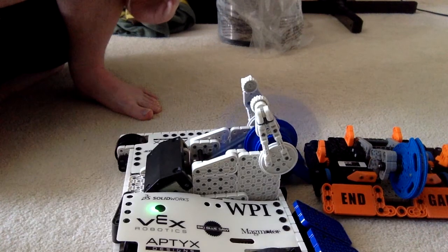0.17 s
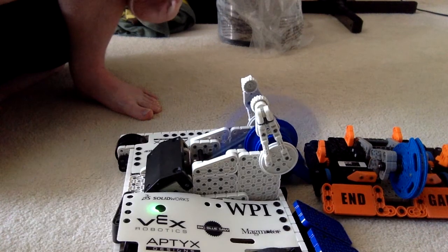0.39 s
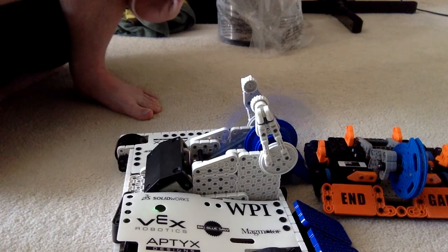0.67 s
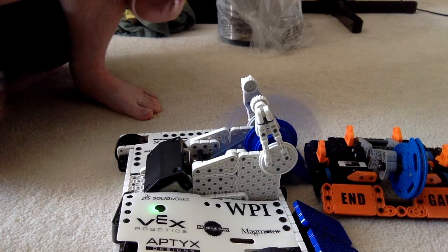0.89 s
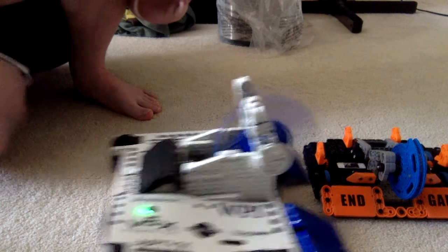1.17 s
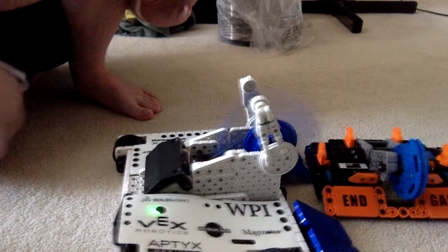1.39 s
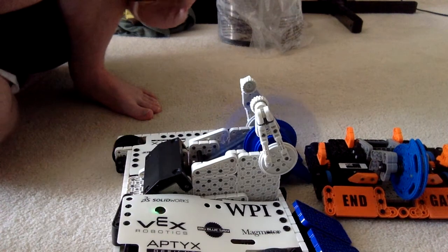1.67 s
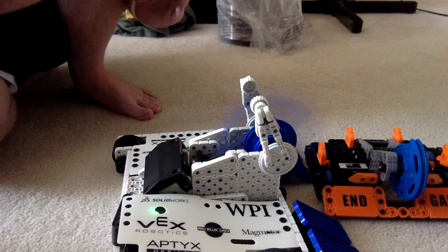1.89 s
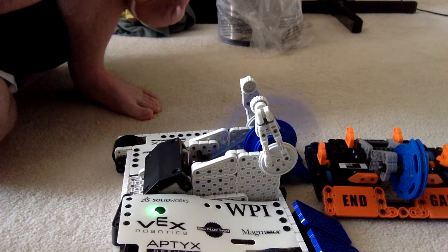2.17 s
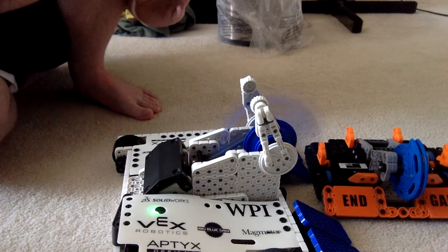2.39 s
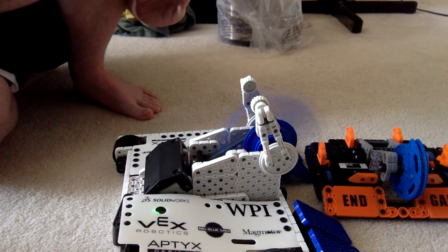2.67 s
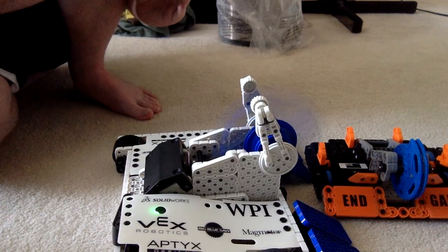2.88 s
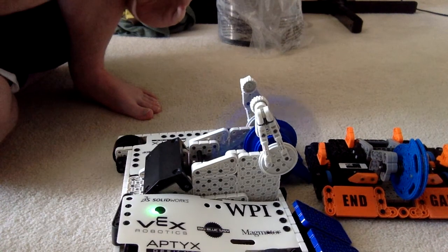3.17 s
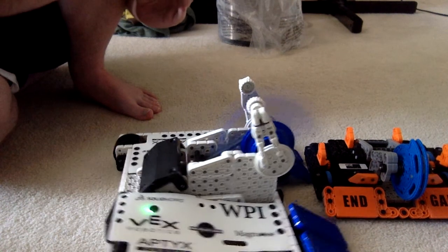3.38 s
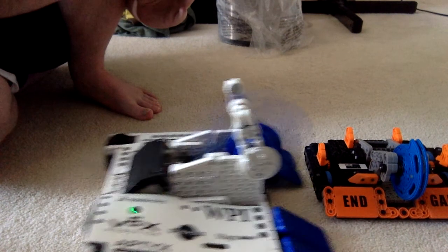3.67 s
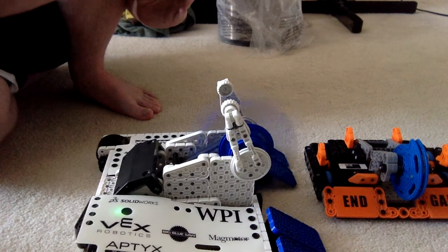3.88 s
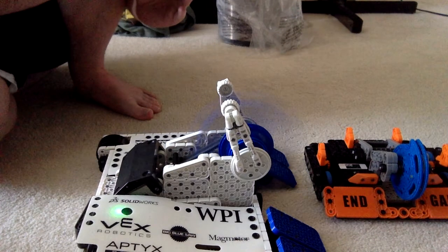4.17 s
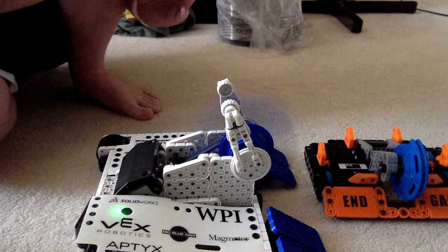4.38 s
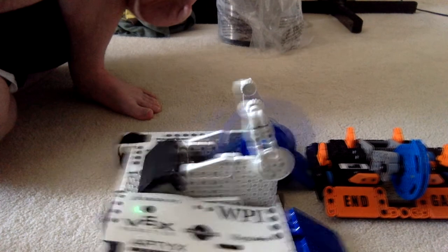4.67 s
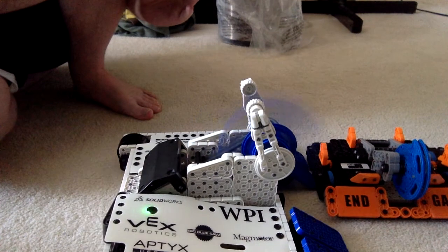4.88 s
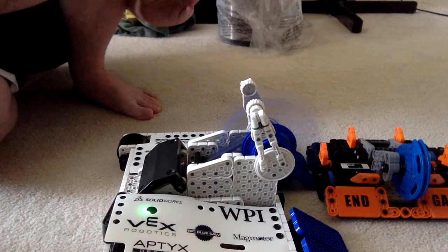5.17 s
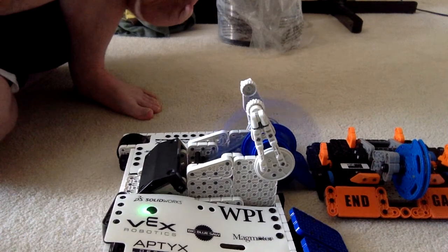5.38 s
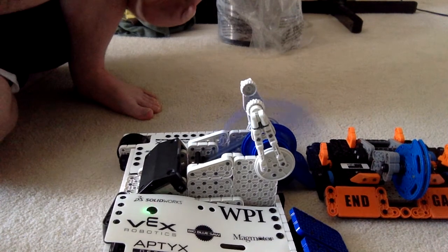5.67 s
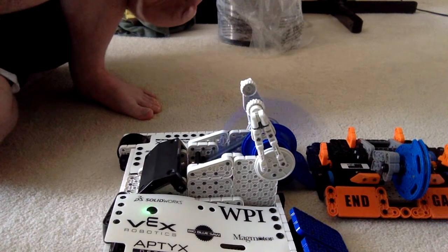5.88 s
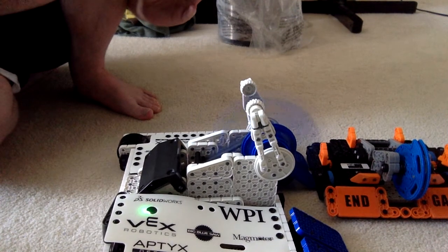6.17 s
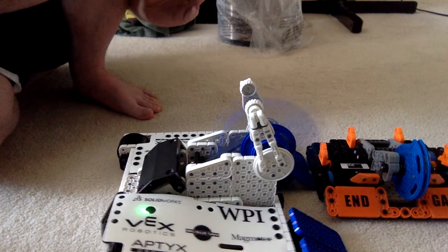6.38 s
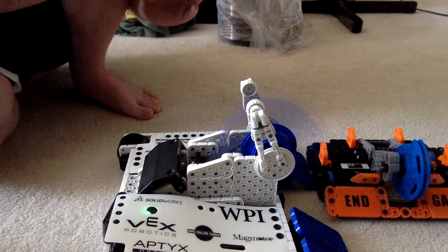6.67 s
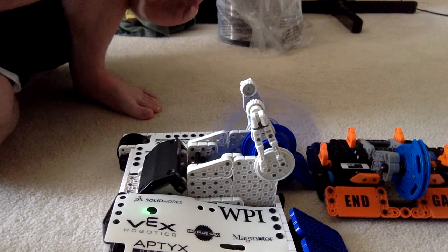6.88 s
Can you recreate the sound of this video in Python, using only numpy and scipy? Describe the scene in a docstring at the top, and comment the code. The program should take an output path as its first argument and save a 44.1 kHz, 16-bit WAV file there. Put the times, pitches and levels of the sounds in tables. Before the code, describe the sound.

A small plastic robot's chain-driven spinner rattles fast and evenly, bright clacks about ten per second over faint hiss, with brief motor whirs, close up.

```python
"""A chain-driven spinner on a small plastic robot on carpet, heard close up.
On most turns the slack chain pings and then slaps the frame; between turns it ticks. Each blow is a
burst of decaying modes. Under it, link-rate noise puffs make the fine clatter of the sprocket.
The wheel motors whine (tooth harmonics) and grind (band noise) at each shuffle; a few knocks sound in the chassis.
"""
import sys
import numpy as np
from scipy import signal
from scipy.io import wavfile
from scipy.ndimage import uniform_filter1d

SR = 44100
rng = np.random.default_rng(int(sys.argv[2]) if len(sys.argv) > 2 else 0)


def output_pcm(signal):
    """Save a mono or channel-first signal as 16-bit PCM at the path in sys.argv[1].

    Samples are clipped to [-1, 1] before scaling.
    """
    pcm = np.clip(np.atleast_2d(signal).T, -1, 1) * 32767
    wavfile.write(sys.argv[1], SR, np.round(pcm).astype(np.int16))


N = 310464

# Whirr noise slope, relative levels: freq_hz, level_db
WHIRR_SLOPE = [(30, -42), (130, -17.5), (320, -13), (480, -10), (1100, -13), (2800, -11.5), (4400, -6.5),
               (8000, -10), (12600, -21), (16500, -28)]
# Frame resonances on that slope: centre_hz, width_hz, lift_db
FRAME_RESONANCES = [(476, 64, -12.5), (1403, 290, 7), (2188, 610, 10), (5060, 300, 3), (7060, 520, 11),
                    (8620, 340, 7.5), (9650, 250, 8.5), (14200, 1100, 11)]
# Chassis knocks: start_s, pitch_hz, level_db
CHASSIS_KNOCKS = [(1.366, 330, -42), (1.662, 3350, -36), (5.523, 2040, -28)]
# Wheel motor runs, one list per motor run: time_s, teeth_hz, level_db. The first list is the second # wheel
# motor, falling in pitch during the same shuffle as the third list
SHUFFLE_RUNS = [
    [(4.7, 1380, -44), (4.725, 1290, -34), (4.75, 1170, -44)],
    [(1.22, 580, -56), (1.305, 790, -45), (1.325, 775, -44), (1.38, 610, -56)],
    [(4.50, 930, -50), (4.53, 970, -39), (4.556, 1055, -36), (4.575, 925, -36), (4.6, 775, -45),
     (4.65, 805, -46), (4.694, 970, -42), (4.752, 948, -39), (4.782, 997, -32), (4.815, 965, -36),
     (4.845, 985, -48), (4.865, 960, -38), (4.9, 980, -50), (4.925, 1020, -39), (4.958, 860, -43),
     (4.99, 928, -38), (5.06, 725, -54)],
    [(5.67, 600, -52), (5.728, 767, -42), (5.76, 860, -46), (5.79, 735, -41), (5.805, 712, -45),
     (5.854, 790, -42), (5.885, 800, -56)],
    [(6.41, 553, -52), (6.428, 560, -34), (6.48, 555, -47), (6.525, 935, -41), (6.56, 963, -30.5),
     (6.61, 845, -39), (6.63, 925, -36), (6.662, 675, -45), (6.7, 840, -45), (6.726, 775, -43),
     (6.775, 720, -46), (6.81, 740, -58)],
]
# Gearbox resonances lifting the tooth harmonics: centre_hz, width_hz, lift_db
GEARBOX_RESONANCES = [(980, 160, -18.5), (1480, 400, 0), (2850, 800, -2.5), (3880, 400, 1),
                      (5400, 1300, -5)]
# Modes of a ping on a stiff part of the frame: pitch_hz, level_db, t60_s
PING_MODES = [(5695, 0, 0.015), (5197, -6, 0.0084), (3190, -5.5, 0.0066)]
# Modes of a broadside slap: pitch_hz, level_db, t60_s
SLAP_MODES = [(4560, -6, 0.014), (4980, 3.5, 0.0087), (5445, -3.5, 0.013), (5687, 6, 0.0096),
              (6694, -6.5, 0.024), (7160, -8, 0.016)]
# Treble modes shared by pings and slaps: pitch_hz, level_db, t60_s
TREBLE_MODES = [(8390, -1, 0.011), (8660, -1, 0.011), (10487, -13.5, 0.03), (12006, -9, 0.019),
                (15300, -21, 0.034)]
# Bright modes of a tick: pitch_hz, level_db, t60_s
TICK_MODES = [(7565, 0, 0.012), (10540, -12.5, 0.011)]
# Lower modes of a tick: pitch_hz, level_db, t60_s
TICK_BODY_MODES = [(4380, -3, 0.007), (5200, 0, 0.007)]
# Links ticking on the spinner hub: start_s, level_db, body_db (relative to the bright modes)
LINK_TICKS = [(0.0723, -12, -8), (0.1316, -26, 6), (0.6008, -10, -13), (1.0101, -18.5, -14),
              (1.216, -18, -11), (1.853, -25, 5), (1.955, -6, -3), (2.1593, -9, -6), (3.1527, -20, -6),
              (3.2699, -18, 1), (3.563, -17, -9), (3.793, -13, -2), (4.2017, -8, -7), (4.2682, -15, -14),
              (4.854, -11.5, -9), (5.0892, -11, -12), (5.3948, -13.5, -9), (6.4895, -10, -8),
              (6.8286, -11.5, -13)]
# Chain pings, most with a slap, some slaps with rebounds: start_s, ping_db, then optionally
# slap_lag_ms, slap_db, treble_db (relative to the other slap modes), then optionally rebound_db
CHAIN_CLACKS = [(0.222, -6.5, 4.3, -6.5, -18), (0.333, -28, 6.7, -19.5, -9), (0.433, -16),
                (0.647, -7.5, 17.6, -9, -10), (0.7488, -11.5, 17.7, -18, -7), (0.8535, -22, 7.2, -3, -4.5),
                (0.971, -11), (1.1609, -4.5, 7.1, -7.5, -10.5), (1.374, -9, 6.8, -4.5, -13.5),
                (1.4845, -6.5, 9, -12, -14), (1.7958, -5, 6.1, -3.5, -9, -19),
                (1.8984, -4.5, 4.9, -3, -3.5), (1.9998, -10.5, 15.5, -11, -22),
                (2.204, -5.5, 8.5, -7, -13, -7.5), (2.3096, -9), (2.4245, -17, 7.8, -6, -8.5, -10),
                (2.7771, -4, 5.6, -2.5, -6), (2.8841, -4, 3.5, -13, -1.5),
                (2.9874, -12.5, 6.3, -3.5, -8.5, -12), (3.093, -8.5), (3.317, -20, 3.1, -11, -16),
                (3.4065, -6, 6.7, 1.5, -12, -13.5), (3.5054, -4.5), (3.6194, -10.5, 8.2, -16, -19, -10),
                (3.8382, -9, 5.8, -12.5, -8, -20), (3.9378, -7.5, 20.2, -11.5, -9),
                (4.042, -6, 8, -1.5, -4.5, -9), (4.149, -3.5, 14.6, -13, -16),
                (4.3514, -6.5, 6.5, -8.5, -1.5), (4.456, -24, 7, -2.5, -7),
                (4.568, -11, 6.2, -4, -14, -1.5), (4.683, -12.5), (4.728, -18), (4.794, -17.5),
                (5.0219, -4.5, 6.9, -3.5, -7.5), (5.137, -6.5, 16.4, -18, -4),
                (5.2378, -5.5, 14.4, -8.5, -6.5), (5.548, -10.5, 18.9, -16, -9),
                (5.6613, -9.5, 7.8, -1.5, -9.5, -8), (5.803, -20), (5.9058, -16),
                (6.0109, -7, 7.1, -2.5, -7), (6.2208, -4, 5.2, -2.5, -8.5, -6), (6.323, -13),
                (6.655, -3.5, 7.1, -7, -11), (6.7677, -16), (6.8765, -7, 6.9, -5, -8.5, -11)]

LINKS_PER_S = 148  # mean
GRIND_DB, TEETH_DB = -5, -3.3  # relative to the run level
PING_TREBLE_DB = -19.5  # relative to the other ping modes
REBOUND_GAP_LAGS, SECOND_LOSS_DB = 1.15, 7.5  # gap in slap lags; second rebound below the first
TICK_BACK_MAX_S, TICK_BACK_DB = .008, -10.5  # chain knocked back on the frame; relative to tick body
EDGE_HZ = 15950


def gain_of(db):
    """Decibels to amplitude."""
    return 10 ** (np.asarray(db) / 20)


def evened(x):
    """Scales to rms 1."""
    return x / np.sqrt(np.mean(x ** 2) + 1e-20)


def add(mix, start_s, sound):
    """Mixes a sound in at start_s, cut at the end of the mix."""
    part = mix[round(start_s * SR):][:len(sound)]
    part += sound[:len(part)]


def filtered(x, order, cutoff_hz, kind):
    """Causal Butterworth filter."""
    return signal.sosfilt(signal.butter(order, cutoff_hz, kind, fs=SR, output="sos"), x)


def coloured(x, gain_db):
    """Minimum-phase filter of the given magnitude, sampled on 2049 bins."""
    log_gain = np.log(gain_of(np.concatenate([gain_db, gain_db[-2:0:-1]])))
    taps = np.fft.ifft(np.exp(np.conj(signal.hilbert(log_gain)))).real
    return signal.oaconvolve(x, taps[:2048])[:N]


def smooth_noise(shape, width):
    """Noise averaged twice along its last axis."""
    return uniform_filter1d(uniform_filter1d(rng.standard_normal(shape), width), width)


def drift(cutoff_hz):
    """Slow random wander of rms 1."""
    return evened(filtered(rng.standard_normal(N), 2, cutoff_hz, "low"))


def ring(modes, contact_s, spread_db):
    """One blow: modes build up over the contact time, randomly detuned and weighted; chain chatter
    makes the decay lumpy. Peak 1."""
    pitch_hz, level_db, t60_s = np.transpose(modes)[:, :, None]
    level_luck, pitch_luck, phase_luck = rng.standard_normal((3, len(modes), 1))
    t = np.arange(1536) / SR
    chatter = smooth_noise((len(modes), len(t)), 50) * 8
    phase = 2 * np.pi * (pitch_hz * (1 + 0.0065 * pitch_luck) * t + phase_luck)
    envelope_db = level_db + spread_db * level_luck - 60 * t / t60_s
    envelope_db = envelope_db + 3.05 * chatter[::-1]  # reversed: another mode's chatter
    waves = np.sin(phase + .5 * chatter) * gain_of(envelope_db)
    rise_s = contact_s * gain_of(4.2 * rng.standard_normal())
    blow = waves.sum(0) * (1 - np.exp(-t / rise_s)) ** 2
    return blow / abs(blow).max()


def patchy(x, depth_db):
    """Parts of the frame buzz louder and softer by turns; depth grows with frequency."""
    hz, _, z = signal.stft(x, SR, nperseg=512)
    patches = uniform_filter1d(rng.standard_normal(z.shape), 8, 0)  # bins
    patches = evened(uniform_filter1d(patches, 12, 1))  # frames
    swing_db = depth_db * hz[:, None] / 6700.0 * patches  # depth_db is rms at 6700 Hz
    return signal.istft(z * gain_of(swing_db), SR, nperseg=512)[1][:N]


def whirr():
    """Spinner motor and chain: hiss that puffs up as each link seats, coloured by the frame."""
    hz = np.fft.rfftfreq(4096, 1 / SR)
    slope_hz, slope_db = np.transpose(WHIRR_SLOPE)
    shape_db = np.interp(np.log(hz + 1), np.log(slope_hz), slope_db)
    for centre_hz, width_hz, lift_db in FRAME_RESONANCES:
        shape_db = shape_db + lift_db / (1 + (2 * (hz - centre_hz) / width_hz) ** 2)
    links = np.cumsum(LINKS_PER_S * (1 + .1 * drift(30.))) / SR
    link_sizes = gain_of(4.13 * rng.standard_normal(2000).clip(max=2))  # some seat harder
    decay = np.exp(-(links % 1) / 0.48)
    puffs = evened(link_sizes[links.astype(int)] * decay * rng.standard_normal(N))
    puffs = filtered(puffs, 1, 2500., "high")  # small, bright knocks
    drive = 0.58 * rng.standard_normal(N) + 0.78 * puffs
    level_db = -40. + .8 * drift(6.)
    return gain_of(level_db) * evened(patchy(coloured(drive, shape_db), depth_db=1.6))


def knocks():
    """Chassis knocks, one decaying mode each."""
    out = np.zeros(N)
    for start_s, pitch_hz, level_db in CHASSIS_KNOCKS:
        add(out, start_s, gain_of(level_db) * ring([(pitch_hz, 0, .04)], contact_s=0.003, spread_db=0))
    return filtered(out, 4, 180., "high")


def teeth(teeth_hz):
    """Harmonics of the tooth rate, each fluttering alone, loud where the gearbox resonates."""
    flutter = smooth_noise((12, len(teeth_hz)), 200) * np.sqrt(300)  # rms about 1
    turns = np.cumsum(teeth_hz * (1 + .01 * flutter[0])) / SR
    out = np.zeros(len(teeth_hz))
    for k in range(1, 12):
        lift = sum(gain_of(lift_db) / (1 + (2 * (k * teeth_hz - centre_hz) / width_hz) ** 4)
                   for centre_hz, width_hz, lift_db in GEARBOX_RESONANCES)
        out += lift * gain_of(4.6 * flutter[k]) * np.sin(2 * np.pi * k * turns)
    return out


def wheel_motors():
    """Tooth harmonics over the band-limited hiss of grinding gears."""
    out = np.zeros(N)
    for run in SHUFFLE_RUNS:
        time_s, teeth_hz, level_db = np.transpose(run)
        t = np.arange(time_s[0], time_s[-1], 1 / SR)
        grind = evened(filtered(rng.standard_normal(len(t)), 2, [1100., 6500.], "band"))
        whine = teeth(uniform_filter1d(np.interp(t, time_s, teeth_hz), size=300))
        sound = gain_of(GRIND_DB) * grind + gain_of(TEETH_DB) * whine
        level = gain_of(np.interp(t, time_s, level_db)) * signal.windows.tukey(len(t), .1)
        add(out, time_s[0], level * sound)
    return out


def jingle(out):
    """Thin jingle of loose links: 300 faint single-mode blows at random times."""
    for place, size, pitch in rng.random((300, 3)):
        blow = ring([(8000.0 + 5000. * pitch, 0, .02)], contact_s=0.0014, spread_db=0)
        add(out, place * N / SR, gain_of(-50. + 13.1 * size) * blow)


def treble(level_db):
    """Treble modes of the frame under one blow."""
    return gain_of(level_db) * ring(TREBLE_MODES, contact_s=.0003, spread_db=3)


def ping():
    """Chain on a stiff part of the frame; barely wakes the treble modes."""
    return ring(PING_MODES, contact_s=.0009, spread_db=3) + treble(PING_TREBLE_DB)


def slap(treble_db):
    """One broadside blow of the chain on the frame."""
    return ring(SLAP_MODES, contact_s=.0002, spread_db=3.5) + treble(treble_db)


def ticks(out):
    """Links on the hub: bright modes, lower body modes, then the chain knocked back on the frame."""
    for start_s, level_db, body_db in LINK_TICKS:
        low_db = level_db + body_db
        add(out, start_s, gain_of(level_db) * ring(TICK_MODES, contact_s=.0007, spread_db=3))
        add(out, start_s, gain_of(low_db) * ring(TICK_BODY_MODES, contact_s=.0004, spread_db=4))
        back_s = start_s + TICK_BACK_MAX_S * rng.random()
        add(out, back_s, gain_of(low_db + TICK_BACK_DB) * slap(treble_db=-4.5))


def clacks(out):
    """Slack chain pings, then may slap; a rebounding slap strikes twice more."""
    for start_s, ping_db, *then in CHAIN_CLACKS:
        add(out, start_s, gain_of(ping_db) * ping())
        if then:
            lag_ms, slap_db, treble_db, *rebound_db = then
            blows_db = [slap_db] + rebound_db + [db - SECOND_LOSS_DB for db in rebound_db]
            for k, blow_db in enumerate(blows_db):
                blow_s = start_s + lag_ms / 1000 * (1 + k * REBOUND_GAP_LAGS)
                add(out, blow_s, gain_of(blow_db) * slap(treble_db))


def chain_blows():
    """All chain impacts, high-passed: small parts radiate no bass."""
    out = np.zeros(N)
    jingle(out)
    ticks(out)
    clacks(out)
    return filtered(out, 8, 3900., "high")


def room(x, t60_s):
    """Frame, carpet and walls scatter each blow: sparse decaying taps of random sign.
    The chain strikes ever-changing spots, so three scatterings take turns."""
    out = np.zeros(N)
    turn = 2 * np.pi * 3 * np.arange(N) / SR  # 3 Hz
    for k in range(3):
        at = np.arange(40, 8000, 12) + rng.integers(0, 12, 664)
        taps = np.zeros(8192)
        taps[at] = rng.choice([-1., 1.], len(at)) * gain_of(-60 * at / SR / t60_s)
        share = np.cos(turn + k * np.pi / 3) * np.sqrt(2 / 3)  # squares of the three sum to 1
        out += signal.oaconvolve(x * share, taps / np.linalg.norm(taps))[:N]
    return out


def scene():
    """Chain and wheel motors with a short and a long scatter, over whirr and knocks."""
    near = chain_blows() + wheel_motors()
    scatter = gain_of(-10.0) * room(near, t60_s=0.075) + gain_of(-16.5) * room(near, t60_s=0.15)
    return (near + scatter + whirr() + knocks())[None]


def record(dry):
    """Clips at full scale, then low-passes at EDGE_HZ."""
    taps = signal.firwin(511, EDGE_HZ, window=("kaiser", 11), fs=SR)
    return signal.oaconvolve(np.clip(dry, -1, 1), taps[None], "same")


dry = scene()
out = record(dry)
output_pcm(out)
```